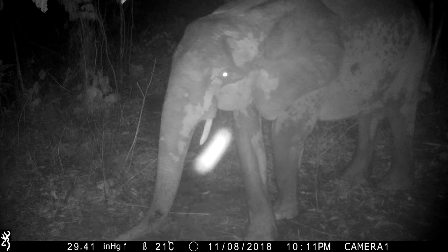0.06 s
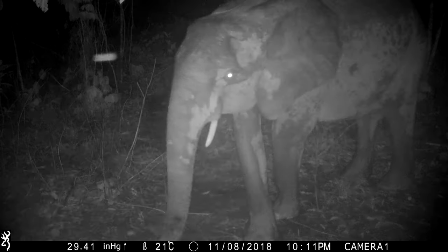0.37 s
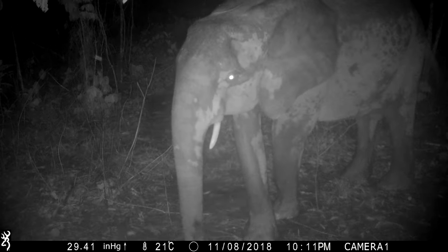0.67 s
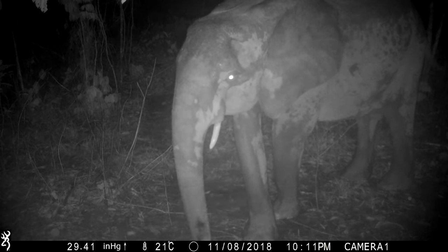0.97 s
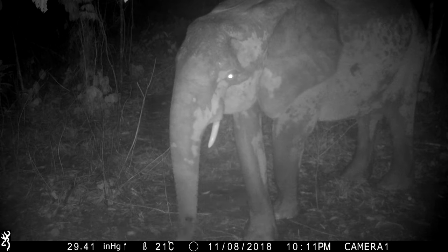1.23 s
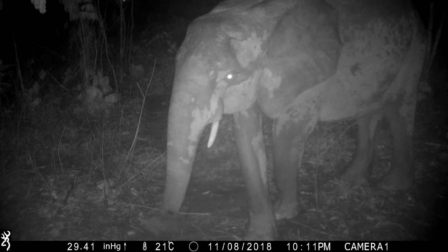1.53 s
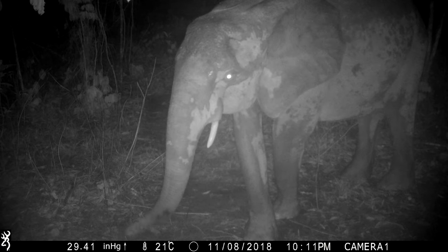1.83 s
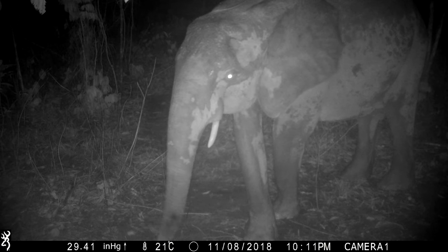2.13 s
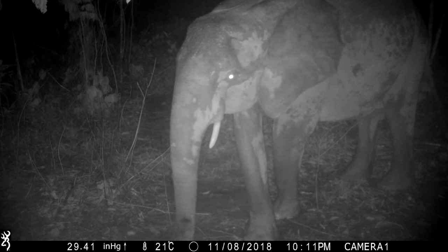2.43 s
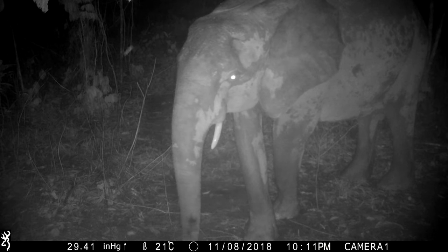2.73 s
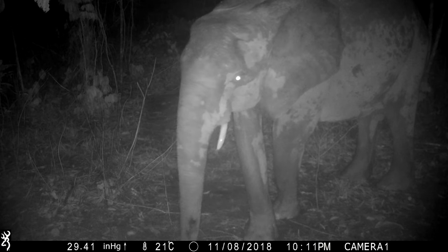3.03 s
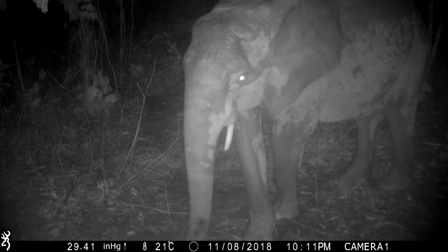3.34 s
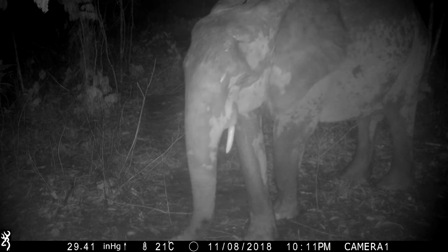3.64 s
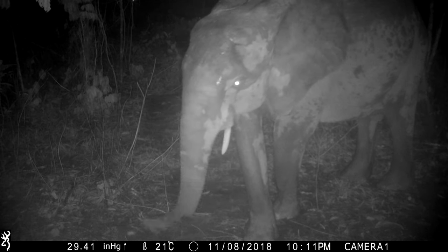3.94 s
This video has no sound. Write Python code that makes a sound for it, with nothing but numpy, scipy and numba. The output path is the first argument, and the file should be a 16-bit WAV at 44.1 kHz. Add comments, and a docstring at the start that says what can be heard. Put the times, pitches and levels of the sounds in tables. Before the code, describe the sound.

A low, rough rumble from a nearby elephant opens, then sinks and fades. High crickets and a far insect chorus carry on through the forest night, with two faint twig ticks and soft microphone hiss.

```python
"""A deep, rasping rumble from a forest elephant close by at night. Slow vocal-fold beats, strong and weak
in turn, ring its throat; a slap of air on every second beat sounds its mouth and trunk. The rumble sags
in pitch and dies away. Three crickets call with wing strokes over a far insect chorus, two twigs tick
and a soft low hum passes. Trees scatter the calls; under them lie forest murmur and microphone hiss."""
import sys
import numpy as np
from scipy import signal
from scipy.fft import rfft, irfft
from scipy.io import wavfile
from scipy.ndimage import uniform_filter1d
from numba import njit

SR = 44100
rng = np.random.default_rng(int(sys.argv[2]) if len(sys.argv) > 2 else 0)


def put_to_file(sound):
    """Save the sound as 16-bit audio at rate SR, in the file named by the first command-line argument."""
    columns = np.atleast_2d(sound).T  # one column per channel
    safe = np.clip(columns, -1, 1)
    whole_steps = np.round(safe * 32767)
    wavfile.write(sys.argv[1], SR, whole_steps.astype(np.int16))


N = 176400
T = np.arange(N) / SR


def undb(db):
    """Decibels to gain."""
    return 10 ** (np.asarray(db) / 20)


def curve(rows, column=1):
    """One table column interpolated over time."""
    rows = np.array(rows, float)
    return np.interp(T, rows[:, 0], rows[:, column])


def unit(x):
    """Scale to rms 1."""
    return x / np.sqrt(np.mean(x ** 2))


def even(x):
    """Hold the slow level at 1, keep the beats."""
    power = uniform_filter1d(uniform_filter1d(x ** 2, 4400), 2200)
    return x / np.sqrt(power + 1e-14)


def noise():
    """White noise."""
    return rng.standard_normal(N)


def walk(rate_hz):
    """Smooth random drift, rms 1."""
    span = max(int(SR / rate_hz), 2)
    return unit(uniform_filter1d(uniform_filter1d(noise(), span), span))


def phase(hz):
    """Running phase in radians."""
    return 2 * np.pi * np.cumsum(hz) / SR


def by_frequency(points):
    """Interpolate (freq_hz, value) points over FFT bins on a log axis."""
    hz, values = np.array(points, float).T
    bins_hz = np.arange(N // 2 + 1) * SR / N
    return np.interp(np.log(bins_hz + .00068), np.log(hz), values)


def colour(x, points):
    """Filter by (freq_hz, gain_db) points."""
    return irfft(rfft(x) * undb(by_frequency(points)), N)


@njit
def svf(x, hz, width_hz):
    """State-variable band-pass."""
    out, band, low = np.empty(len(x)), 0., 0.
    for i in range(len(x)):
        g, damping = np.tan(np.pi * hz[i] / SR), width_hz / hz[i]
        v = (band + g * (x[i] + 1e-18 - low)) / (1 + g * (g + damping))
        band, low = 2 * v - band, low + 2 * g * v
        out[i] = damping * v
    return out


def ring(x, hz, width_hz):
    """A resonance whose centre may move."""
    return svf(x, hz * np.ones(N), float(width_hz))


def steep(x, hz, width_hz):
    """The same resonance twice."""
    return ring(ring(x, hz, width_hz), hz, width_hz)


def add(out, start_s, sound):
    """Mix in a short sound."""
    index = int(start_s * SR) + np.arange(len(sound))
    inside = (index >= 0) & (index < N)
    out[index[inside]] += sound[inside]


def place(x, pan_db, wet_db, t60_s=.72):
    """Pan (positive is left) and add scatter from trees and leaves."""
    t = T[:SR // 2]
    tail = rng.standard_normal((2, len(t))) * undb(-60 * t / t60_s) * (t > .002)
    tail /= np.sqrt(np.sum(tail ** 2, axis=1, keepdims=True))
    scatter = signal.fftconvolve(x[None], tail, axes=1)[:, :N]
    sides = undb(np.array([[pan_db], [-pan_db]]) / 2)
    return (x + undb(wet_db) * scatter) * sides / sides.mean()


def lag_right(pair):
    """Sound reaches the right microphone port one sample late."""
    return np.array([pair[0], np.roll(pair[1], 1)])


# Vocal-fold beat rate: time_s, pitch_hz
FOLD_PITCH = [(0, 42.4), (.13, 42.1), (.23, 43.5), (.38, 41.0), (.62, 39.4), (.76, 39.8), (1.0, 38.6),
              (1.12, 37.0), (1.3, 34.6), (1.55, 32.4), (1.75, 29.8), (2.2, 29)]
# Beat unevenness: time_s, roughness_ratio
FOLD_ROUGHNESS = [(0, .04), (.3, .06), (.5, .14), (.75, .05), (1.0, .07), (1.2, .25), (1.4, .5), (2.1, .6)]


def elephant():
    """The vocal folds pace chest, throat and rasp; the rumble closes softly."""
    cycles = np.cumsum(curve(FOLD_PITCH)) / SR
    rough = curve(FOLD_ROUGHNESS)
    fade = curve([(2.1, .83), (2.25, 0)])
    return (chest(cycles, rough) + throat(fold_beats(cycles, rough), rough) + rasp(cycles, rough)) * fade


def fold_beats(cycles, rough, weak_gain=.44):
    """One pulse a cycle, strong and weak in turn; roughness unsettles timing and level."""
    beat = np.arange(int(cycles[-1]))
    jitter, shimmer = rng.standard_normal((len(beat), 2)).T
    beat_s = np.interp(beat, cycles, T)
    spread = np.interp(beat_s, T, rough)
    index = np.clip((beat_s + .004 * spread * jitter) * SR, 0, N - 1).astype(int)
    strength = np.where(beat % 2, 1, weak_gain) * undb(-16 * spread * shimmer)
    return np.bincount(index, strength, N)


# Chest tone envelopes: time_s, fundamental_rel_db, overtones_rel_db
CHEST_LEVELS = [(0, -37.5, -50), (.4, -34, -46), (.94, -29.5, -45.5), (1.3, -40, -52.5), (1.62, -46, -66),
                (1.82, -53, -64), (2.04, -49.5, -73.5), (2.2, -64, -60.5)]
# Subharmonic and fundamental: pitch_ratio, offset_db, pan_db
CHEST_FUNDAMENTAL = [(.5, -16, -7), (1, 0, -8)]
# Low overtones: pitch_ratio, offset_db, pan_db
CHEST_OVERTONES = [(1.5, -3, 0), (2, 8, -13.5), (2.5, 3.5, 27), (3, 5.5, 20)]


def chest(cycles, rough):
    """The clean lowest partials; the alternating beat adds half multiples."""
    out = 0
    for column, partials in (1, CHEST_FUNDAMENTAL), (2, CHEST_OVERTONES):
        level_db = curve(CHEST_LEVELS, column)
        for ratio, offset_db, pan_db in partials:
            tone = -np.cos(2 * np.pi * ratio * (cycles + .18 * rough * walk(24)))
            gain = undb(level_db + offset_db + 2 * rough * walk(11))
            out += place(tone * gain, pan_db, wet_db=-58)
    return out


# Throat envelope: time_s, rel_db
THROAT_LEVEL = [(0, -24.5), (.1, -26.5), (.36, -29.5), (.44, -33), (.6, -37), (.8, -32), (.94, -37.5),
                (1.14, -36), (1.33, -43), (1.45, -41), (1.69, -51.5), (1.85, -49), (2.06, -53), (2.17, -77)]
# Moving throat resonance: time_s, centre_hz
THROAT_CENTRE = [(0, 167.4), (.22, 163.6), (.38, 165.3), (.48, 139.8), (.57, 131), (.68, 155.4),
                 (1.0, 163.9), (1.25, 162.6), (1.36, 173.7), (1.57, 180.6), (1.7, 203), (2.1, 209.4)]


def throat(beats, rough):
    """Beats ring two close resonances; as they loosen, turbulence and a steadier tone join in."""
    hz = curve(THROAT_CENTRE)
    drive = even(beats) + rough * noise()
    lower = ring(ring(drive, hz, width_hz=37.5), hz, width_hz=54)
    upper = undb(-3) * steep(drive, hz=217.4, width_hz=13.9)
    sung = 2.6 * rough * np.sin(phase(hz + 16 * walk(57.8)))
    voice = even(even(lower + upper) + sung) * undb(curve(THROAT_LEVEL))
    return place(voice, pan_db=11, wet_db=-15)


# Low rasp resonance envelope: time_s, rel_db
RASP_LOW_LEVEL = [(0, -49), (.24, -44.5), (.46, -50.5), (.95, -50), (2.1, -83)]
# Middle rasp resonance envelope: time_s, rel_db
RASP_MID_LEVEL = [(0, -72), (.3, -51), (.65, -54.5), (1.12, -51), (1.62, -70), (2.06, -77.5), (2.12, -90)]
# Mouth resonance envelope: time_s, rel_db
MOUTH_LEVEL = [(0, -50.5), (.42, -58.5), (.7, -46), (1.25, -66.5), (2.1, -91)]
# Trunk resonances: time_s, low_hz, mid_hz
TRUNK_CENTRES = [(0, 574, 850), (.24, 549, 748), (.44, 600, 766), (.54, 597.4, 790), (.72, 547, 806),
                 (.84, 609, 855), (1.0, 661, 729), (1.3, 565, 719), (1.55, 575.4, 740), (2.06, 568, 842)]
# Mouth resonance: time_s, centre_hz
MOUTH_CENTRE = [(0, 1152), (.27, 1064), (.6, 1163), (.75, 1167), (.95, 988), (1.2, 1170)]
# Broad rasp spectrum: freq_hz, gain_db
RASP_SPECTRUM = [(150, 2.5), (280, 8.5), (400, -3.5), (700, -1), (1250, -10), (2200, -22), (3400, -18),
                 (8000, -37)]


def rasp(cycles, rough):
    """An uneven slap and puff of air on every second beat sound the mouth and trunk."""
    turns = cycles / 2 - .92 + .0594 * walk(19.3)  # one turn per two beats
    puffs = np.exp(1.3 * (np.cos(2 * np.pi * turns) - 1))
    flow = (.38 + puffs) * undb(2 * walk(59))
    slaps = np.diff(np.floor(turns), prepend=np.floor(turns[0]))
    drive = unit(flow * noise()) + .43 * unit(slaps)
    low = even(steep(drive, curve(TRUNK_CENTRES), 53)) * undb(curve(RASP_LOW_LEVEL) - 3.5)
    mid_db = curve(RASP_MID_LEVEL) - 2.5 + 9.4 * rough * walk(28)
    mid = even(steep(drive, curve(TRUNK_CENTRES, column=2), 45)) * undb(mid_db)
    mouth = even(steep(drive, curve(MOUTH_CENTRE), 161)) * undb(curve(MOUTH_LEVEL) - 3)
    resonant = low + mid + mouth + nasal_hiss(flow) + trunk_note(flow) + growls()
    effort_db = uniform_filter1d(curve(RASP_LOW_LEVEL), size=11000)
    broad = unit(colour(flow ** .31 * noise(), RASP_SPECTRUM)) * undb(effort_db + 2.5)
    return place(resonant, pan_db=7, wet_db=-7, t60_s=.2) + place(broad, pan_db=9, wet_db=-3, t60_s=.12)


# Loudest rasps: start_s, resonance_hz, peak_rel_db
GROWLS = [(0.24, 750, -33), (0.287, 985, -42.5), (0.332, 1103, -49), (.517, 771, -40), (0.618, 1208, -43),
          (0.669, 1165, -48), (0.719, 1199, -49), (.772, 1120, -59), (0.871, 964, -44.5),
          (0.959, 972, -41.5), (0.991, 710, -39), (1.097, 719, -41.5)]


def growls(rise_s=.0065, waver_hz=50, splash_db=-11):
    """Harder slaps: each rings one resonance briefly, with a splash of air."""
    out = 0
    for start_s, hz, db in GROWLS:
        age = np.maximum(T - start_s, 0) / rise_s
        tone = np.sin(phase(hz + waver_hz * walk(395)))
        splash = undb(splash_db) * unit(steep(noise(), hz, width_hz=710))
        out += undb(db) * age * np.exp(1 - age) * (tone + splash)
    return out


# Clear trunk note: time_s, pitch_hz, rel_db
TRUNK_NOTE = [(0, 544, -58), (.06, 557, -43.5), (.2, 570, -48), (.25, 579.6, -37.5), (.33, 585, -39),
              (.39, 595, -43.5), (.445, 615, -40.5), (.49, 630, -75), (.6, 625, -120)]


def trunk_note(flow):
    """A rising note that pulses with the airflow."""
    tone = np.sin(phase(curve(TRUNK_NOTE) + 4 * walk(60.6)))
    return tone * flow ** .9 * undb(curve(TRUNK_NOTE, column=2))


# Trunk hiss envelope: time_s, rel_db
NASAL_LEVEL = [(0, -56.5), (.3, -58), (.7, -64), (1.2, -71.5), (2.1, -85)]


def nasal_hiss(flow):
    """Puffs of air hiss in the trunk's two upper resonances."""
    hiss = flow ** 2 * noise()
    bands = steep(hiss, hz=2046, width_hz=188) + 1.8 * steep(hiss, hz=3090, width_hz=190)
    return even(bands) * undb(curve(NASAL_LEVEL) - 2.5)


# Near cricket's chirps: start_s, stroke_count
CHIRPS = [(1.1582, 1), (1.2776, 1), (1.3973, 2), (1.5566, 2), (1.7187, 2), (1.8781, 2), (2.0405, 2),
          (2.2004, 2), (2.363, 2), (2.523, 2), (2.6856, 2), (2.846, 2), (3.0088, 2), (3.17, 2)]
# Pitch arch of one wing stroke: time_s, pitch_hz
CHIRP_PITCH = [(0, 5057), (.009, 5160), (.019, 5150), (.032, 4950)]


def near_cricket(lengths_s=(.034, .037), period_s=.041, octave_db=-17.5):
    """Wing strokes, mostly paired, each a pure arched note with a faint octave."""
    out = np.zeros(N)
    for start_s, strokes in CHIRPS:
        for k, length_s in enumerate(lengths_s[:strokes]):
            t = T[:int(length_s * SR)]
            envelope = np.clip(t / .0025, 0, 1) * np.clip((length_s - t) / .0077, 0, 1) * undb(-50 * t)
            angle = phase(curve(CHIRP_PITCH)[:len(t)] + 8 * rng.standard_normal())
            note = envelope * np.sin(angle) + undb(octave_db) * envelope ** 3 * np.sin(2 * angle)
            add(out, start_s + k * period_s - .002, undb(-44) * note)
    flicker = undb(.5 * walk(250))
    return lag_right(place(out * flicker, pan_db=-2, wet_db=-16, t60_s=.2))


# High cricket's trills: start_s, stroke_count, rel_db
HIGH_TRILLS = [(-.175, 10, -39.5), (.3685, 10, -39), (.892, 11, -39.5), (1.437, 10, -39), (1.959, 11, -42),
               (2.504, 11, -40.5), (3.000, 11, -40.5), (3.565, 11, -40)]
# Its wing stroke: from_accent_s, bend_hz, offset_db
HIGH_STROKE = [(-.006, 124, -18), (-.003, 115, -14.5), (0, 13, -1.5), (.003, -150, -10.5),
               (.006, -170, -7.5), (.009, 23, -11.5), (0.015, 24, -14), (0.016, -60, -20)]
# Low cricket's trills: start_s, stroke_count, rel_db
LOW_TRILLS = [(.067, 11, -43.5), (1.508, 9, -44.5), (2.250, 8, -44), (2.979, 12, -44.5), (3.755, 7, -44.5)]
# Its wing stroke: from_accent_s, bend_hz, offset_db
LOW_STROKE = [(-.013, 163, -32), (-.005, 60, -6.5), (0, -4, -0.5), (.006, -75, -10.5), (0.016, -170, -22)]


def trilling_crickets():
    """A fast high triller and a slower low one, scattered by nearby leaves."""
    high = trills(HIGH_TRILLS, HIGH_STROKE, hz=6060, period_s=.0237, settle_s=.041, flat_hz=130)
    low = trills(LOW_TRILLS, LOW_STROKE, hz=4130, period_s=.0411, settle_s=.051, flat_hz=78)
    high = place(high, pan_db=4, wet_db=-8.5, t60_s=.16)
    low = place(low, pan_db=6, wet_db=-3.5, t60_s=.2)
    return lag_right(high + low)


def trills(rows, stroke, hz, period_s, settle_s, flat_hz, soft_db=-7.5):
    """Accented wing strokes that fall in pitch; each trill starts soft and flat, then settles."""
    out = np.zeros(N)
    times_s, bend_hz, offset_db = np.array(stroke).T
    t = np.arange(times_s[0], times_s[-1], 1 / SR)
    for start_s, strokes, db in rows:
        for k, (detune, vary) in enumerate(rng.standard_normal((strokes, 2))):
            onset = np.exp(-k * period_s / settle_s)
            pitch_hz = hz - flat_hz * onset + np.interp(t, times_s, bend_hz) + 10 * detune
            level_db = db + soft_db * onset + .5 * vary + np.interp(t, times_s, offset_db)
            add(out, start_s + k * period_s + t[0], undb(level_db) * np.sin(phase(pitch_hz) + vary))
    return out


# Gliding low insect band: time_s, centre_hz
FAR_LOW_CENTRE = [(0, 3800), (1.85, 3690), (2.0, 3481), (2.2, 3500), (2.5, 3780), (3.3, 3537), (4, 3930)]
# Low band envelope: time_s, rel_db
FAR_LOW_LEVEL = [(0, -63.5), (3.3, -61), (4, -64)]
# Middle band envelope: time_s, rel_db
FAR_MID_LEVEL = [(0, -53.5), (.8, -62), (1.3, -61.5), (2, -62.5), (2.8, -59.5), (3.5, -57), (4, -56)]
# High band envelope: time_s, rel_db
FAR_HIGH_LEVEL = [(0, -68), (.3, -63), (2.04, -62), (2.34, -68.5), (3.3, -64.5), (3.55, -62), (4, -59.5)]


def far_insects():
    """Many distant callers merge into three fluttering bands."""
    def band(levels, hz, width_hz, flutter_db):
        chorus = steep(noise(), hz, width_hz) * undb(flutter_db * walk(45))
        return unit(chorus) * undb(curve(levels) - 13)

    low = band(FAR_LOW_LEVEL, curve(FAR_LOW_CENTRE), width_hz=90, flutter_db=3)
    mid = band(FAR_MID_LEVEL, hz=3966, width_hz=220, flutter_db=5.5)
    high = band(FAR_HIGH_LEVEL, hz=6800, width_hz=700, flutter_db=4)
    return place(low + mid + high, pan_db=3.5, wet_db=6.5)


# Far insect buzzes: middle_s, rel_db
BUZZES = [(1.97, -61), (2.55, -62), (3.17, -58.5), (3.9, -58.5)]


def far_buzzes(centre_hz=7300, rise_hz_per_s=2500, width_hz=1000, half_length_s=.11):
    """Thin distant insect buzzes that swell, rise and ebb."""
    out = 0
    for middle_s, db in BUZZES:
        progress = (T - middle_s) / half_length_s
        hz = centre_hz + rise_hz_per_s * half_length_s * np.tanh(progress)
        buzz = unit(steep(steep(noise(), hz, width_hz), hz, width_hz))
        out += buzz * undb(db - 13) * np.exp(-progress ** 4)
    return place(out, pan_db=1, wet_db=-1.5, t60_s=.08)


# Twig ticks: start_s, centre_hz, level_db
TWIGS = [(2.237, 1560, -58), (2.95, 4540, -54)]


def twigs(decay_s=.0034):
    """Small dry ticks in the leaf litter."""
    out = 0
    for start_s, hz, db in TWIGS:
        envelope = (T > start_s) * np.exp(-np.abs(T - start_s) / decay_s)
        out += unit(steep(noise(), hz, width_hz=920)) * undb(db) * envelope
    return place(out, pan_db=3, wet_db=-1)


def low_hum(middle_s=3.49, half_length_s=.14):
    """A soft low hum swells and fades."""
    swell = np.exp(-((T - middle_s) / half_length_s) ** 2)
    return even(steep(noise(), hz=68.6, width_hz=27)) * undb(-58) * swell


# Murmur and hiss spectrum: freq_hz, gain_db
AIR_SPECTRUM = [(12, -72), (20, 5.5), (80, -10), (98, -4), (129, -11), (361, -26), (427, -28.5),
                (1740, -32), (3000, -32.5), (3900, -22), (4700, -29), (6000, -23.5), (8000, -35.5),
                (10500, -40.5), (12500, -28), (14500, -35.5), (16000, -35.5)]
# Left-right likeness: freq_hz, correlation_ratio
AIR_CORRELATION = [(400, 0), (8000, 0.56)]


def air(mid_db=-57.5):
    """Wide, low forest murmur and narrower microphone hiss."""
    correlation = by_frequency(AIR_CORRELATION)
    side_gain = np.sqrt((1 - correlation) / (1 + correlation))
    mid = colour(noise(), AIR_SPECTRUM)
    side = irfft(rfft(colour(noise(), AIR_SPECTRUM)) * side_gain, N)
    return np.array([mid + side, mid - side]) * undb(mid_db) / mid.std()


def scene():
    """Elephant, insects and forest together."""
    calls = elephant() + near_cricket() + trilling_crickets() + far_insects() + far_buzzes()
    return calls + twigs() + low_hum() + air()


def record(dry):
    """The recorder cuts the treble above 15.6 kHz."""
    return signal.sosfilt(signal.ellip(10, .2, 80, 15600, fs=SR, output="sos"), dry)


dry = scene()
out = record(dry)
put_to_file(out)
```